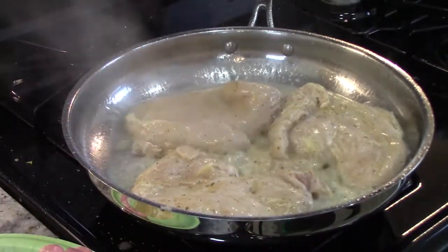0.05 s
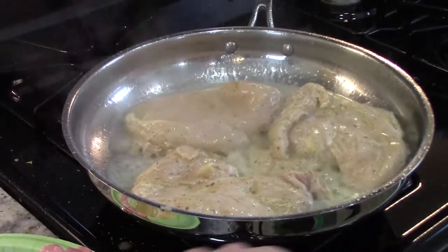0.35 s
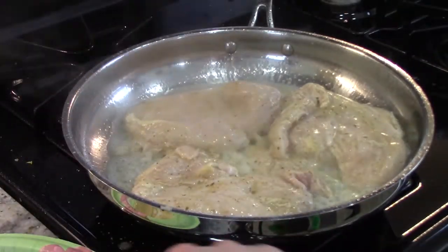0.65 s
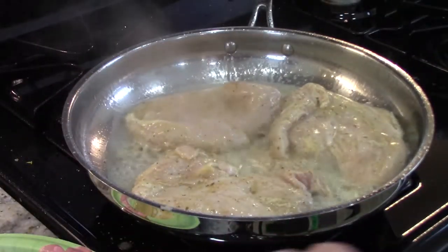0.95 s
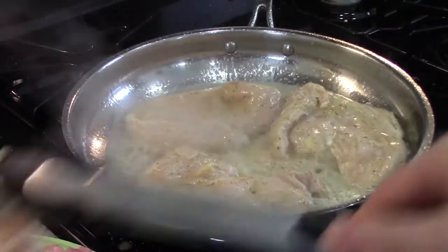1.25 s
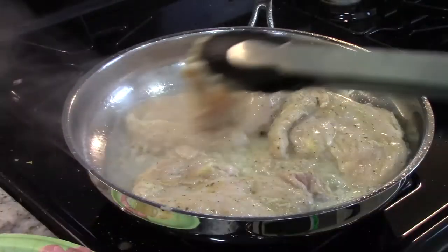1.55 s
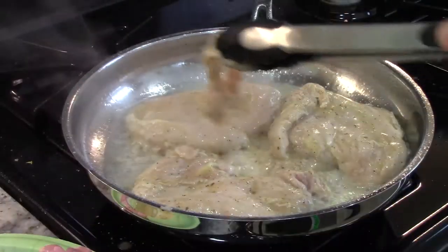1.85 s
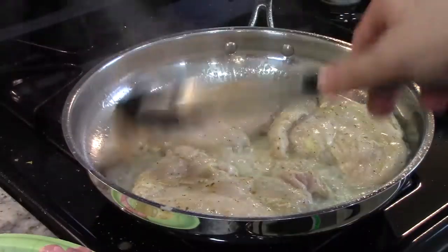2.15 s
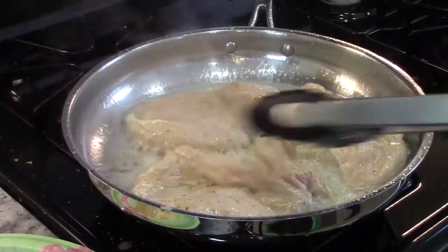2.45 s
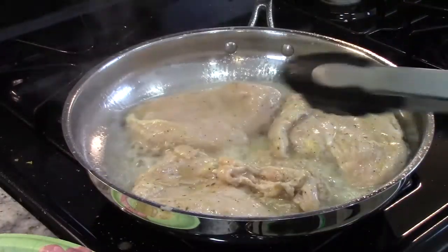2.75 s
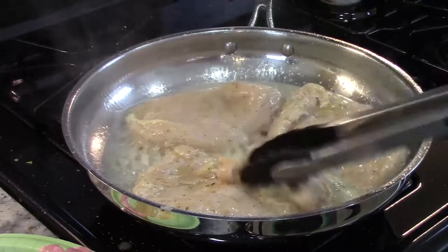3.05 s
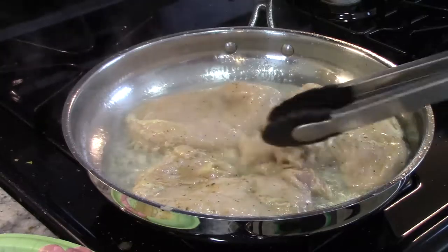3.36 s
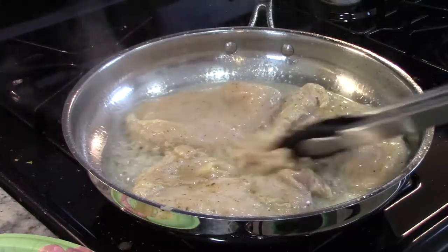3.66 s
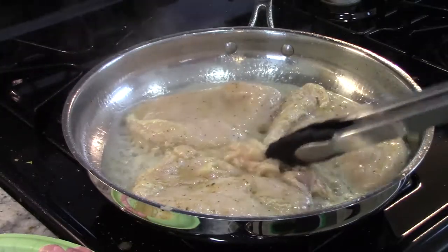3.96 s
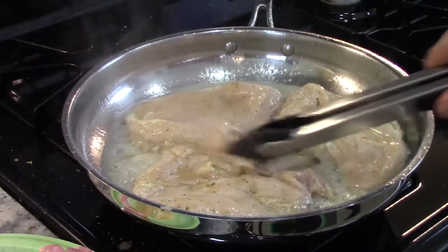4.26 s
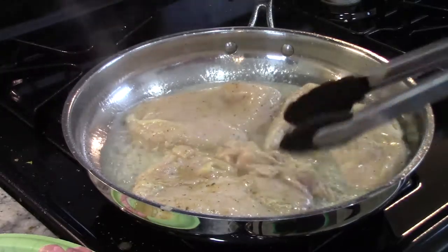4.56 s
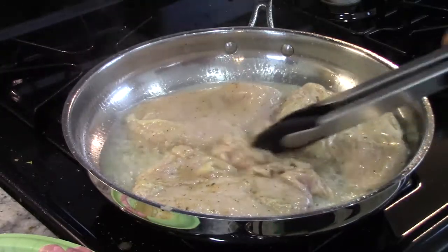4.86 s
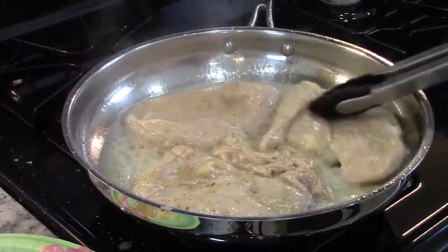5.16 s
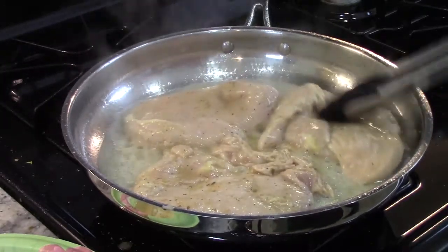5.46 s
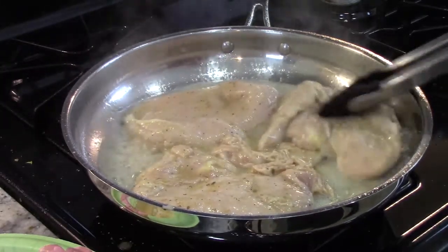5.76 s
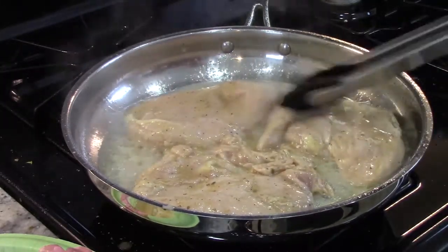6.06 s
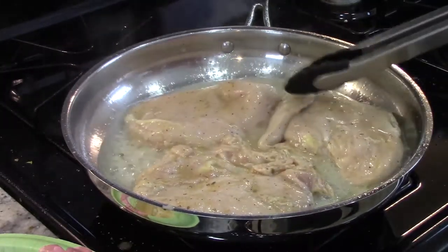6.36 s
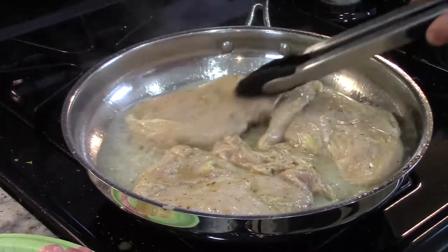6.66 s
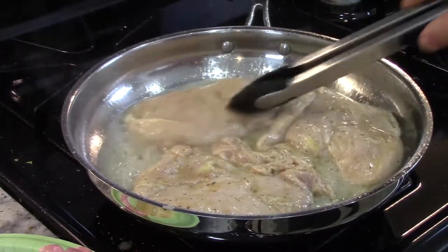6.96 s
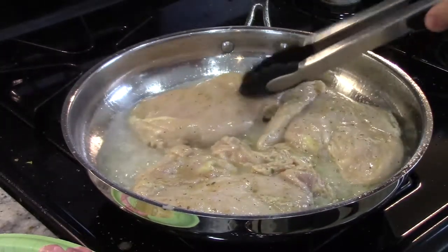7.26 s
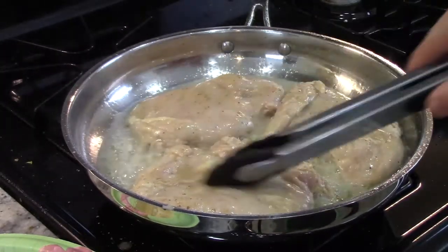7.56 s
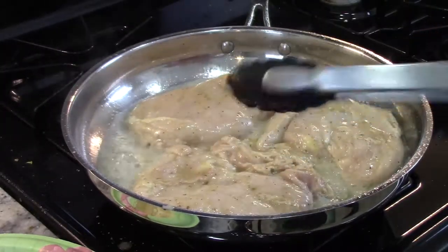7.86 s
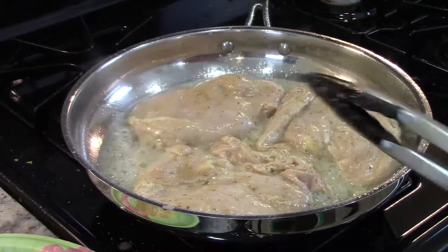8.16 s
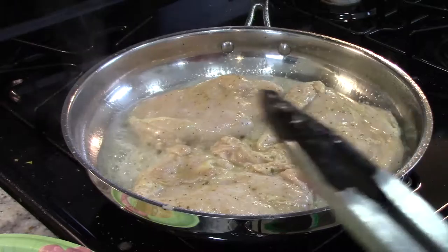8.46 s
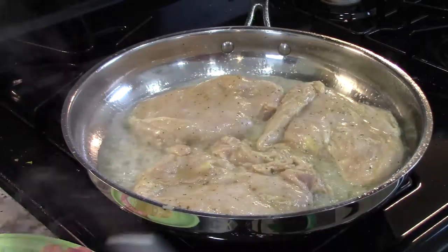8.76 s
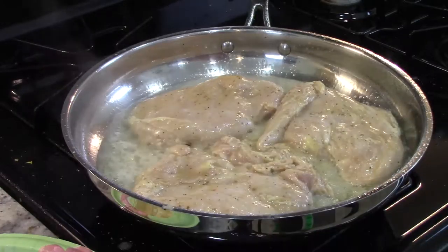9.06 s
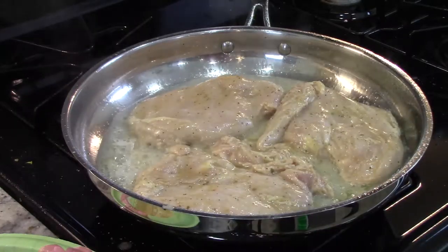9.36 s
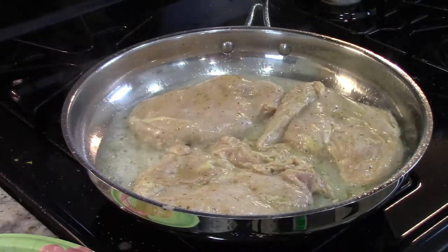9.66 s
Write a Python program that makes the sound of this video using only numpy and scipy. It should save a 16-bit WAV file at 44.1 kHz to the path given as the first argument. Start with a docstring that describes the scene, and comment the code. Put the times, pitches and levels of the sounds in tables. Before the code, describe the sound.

Chicken sizzles steadily in an oiled steel skillet, slowly easing, with small spits and bubbling pops later on.

```python
"""A kitchen, close to the stove: marinated chicken fries in a steel skillet while tongs nudge it about.
Countless steam bubbles burst in the oil as a bed of fizz, crackle and tiny rings, coloured by pan and room.
The sizzle sinks as the pan cools, and the stove hums underneath. Later, wet meat puffs on hot steel,
shoves rumble softly, drops spit, and a flood of juice brings fat bubbles and pops."""
import sys
import numpy as np
from scipy import signal
from scipy.fft import rfft, irfft, next_fast_len
from scipy.io import wavfile
from scipy.ndimage import uniform_filter1d

SR = 44100
rng = np.random.default_rng(int(sys.argv[2]) if len(sys.argv) > 2 else 0)


def generate_wav(signal):
    """Clip the signal to [-1, 1] and save it as 16-bit WAV at the path in sys.argv[1]."""
    frames = np.transpose(np.atleast_2d(signal))
    scaled = np.clip(frames, -1, 1) * 32767
    pcm = np.round(scaled).astype(np.int16)
    wavfile.write(sys.argv[1], SR, pcm)


N = 432163

# Tone of the bursting bubbles. Each row: frequency in Hz, relative level in dB.
SIZZLE_TONE = [(120, -21.5), (220, -15.5), (450, -15.5), (800, -12), (1200, -7.5), (1650, -10),
               (2900, -6.5), (4200, -3), (5200, -2.5), (6800, -5.5), (10000, -6), (13000, -10),
               (15800, -15)]
# Resonances of the pan and the hob around it. Each row: centre in Hz, width in Hz, lift in dB.
PAN_RESONANCES = [(300, 25, 3), (351.6, 41, 11), (492.6, 35.5, 12), (575, 44, 5), (620.5, 61, 9.5),
                  (687, 32, 4.5), (848, 35, 3), (1005, 36, 7.5), (1115, 54, 1.5), (1210, 58, 4),
                  (2016, 145, 7.5), (2150, 36, 7.5), (2197, 40, 2.5), (2544, 140, 2.5), (2690, 100, 1),
                  (3510, 65, 8), (3700, 90, 0.5), (4080, 80, 2), (4570, 70, 0), (4810, 70, -0.9),
                  (5220, 62, 3.5), (5280, 80, -1), (5800, 110, 1.5), (7230, 200, 2), (9030, 350, 1.5)]
# Where the sizzle leans in the stereo image. Each row: frequency in Hz, left minus right in dB.
SIZZLE_BALANCE = [(60, -3), (92, 0.0), (140, 18), (210, 0), (330, 1.5), (500, 4.0), (770, 4.0), (1170, 3.5),
                  (1790, 2.5), (2740, 3.5), (4190, 1), (6410, 4), (9810, 1.5), (15000, 0.5)]
# Stereo width. Each row: frequency in Hz, left-right likeness from 0 (wide) to 1 (mono).
STEREO_LIKENESS = [(100, 0.74), (620, 0.83), (800, .45), (1100, 0.8), (1450, .45), (2000, 0.86),
                   (2950, 0.26), (3600, 0.65), (4800, 0.96), (6000, 0.64), (7000, 0.15), (10000, 0.15),
                   (12000, 0.027), (16000, .03)]
# Wet meat meets fresh hot oil and the boil surges. Each row: start in seconds, lift in dB, decay in seconds.
BOIL_SURGES = [(0.13, 1.4, 0.4), (1.19, 1.2, 0.11), (1.98, 1.45, 0.78), (4.42, 1, .2), (5.82, 0, .2),
               (6.9, 1, .4), (7.95, 0.5, .2), (8.89, 1.5, 0.23)]
# Low wash of stove and kitchen. Each row: frequency in Hz, relative level in dB.
WASH_TONE = [(15, -15), (45, -12), (72, -4.5), (96, 6.5), (150, 5), (205, -15), (290, -2), (600, -36),
             (1500, -31), (6000, -48)]
# Mains hum of the stove. Each row: frequency in Hz, level in dB around which it wavers.
HUM_PARTIALS = [(120, -55.5), (360, -59.5)]
# Wet meat touches hot steel. Each row: start in seconds, relative level in dB, decay in seconds.
STEAM_PUFFS = [(3.855, -35, 0.014), (5.618, -35, .008), (5.67, -31, 0.012), (6.955, -41, .015),
               (8.101, -36, 0.033), (8.97, -35, .004)]
# The tongs push the meat about. Each row: start in seconds, length in seconds, level in dB.
MEAT_SHOVES = [(4.82, .26, -64), (5.17, .34, -53), (6.148, .3, -59)]
# Drops of juice burst in the oil. Each row: start in seconds, relative level in dB.
JUICE_SPITS = [(5.669, -15), (5.8784, -10), (6.31, -18), (6.6816, -11), (6.734, -11), (6.963, -13),
               (7.2004, -15), (7.3057, -11), (7.7696, -13), (8.3492, -20), (8.937, -16), (8.97, -18),
               (9.0737, -16)]
# The tongs press out a gush of juice. Each row: start in seconds, relative amount in dB.
JUICE_GUSHES = [(6.67, -13), (7.22, -6.5), (7.64, -4), (8.47, -13)]
# The largest juice bubbles pop. Each row: start in seconds, relative level in dB, starting pitch in Hz.
JUICE_POPS = [(6.7379, -22, 3490), (6.8971, -27, 2010), (6.9594, -27, 3510), (7.2694, -26, 2070),
              (7.4727, -26, 3130), (7.6533, -22, 2620), (7.7144, -32, 2420), (8.0365, -24, 2100),
              (8.5044, -29, 3470), (8.9344, -25, 3520)]

BOIL_DB, COOL_DB_PER_S = -26.5, 0.6319  # the boil sinks slowly as the meat cools the pan
STIR_S, STIR_DB_PER_S = 4.25, 0.6153  # shoving the large pieces about cools the oil further
FLOOD_S, FLOOD_DB_PER_S = 6.53, 1.35  # juice runs out from under a lifted piece and feeds the boil
REST_S, REST_DB_PER_S = 7.87, 3.5  # the tongs let go and the boil dies down


def amp(db):
    """Decibels to gain."""
    return 10 ** (np.asarray(db) / 20)


def unit_rms(x):
    """Scales to an rms of one."""
    return x / np.sqrt(np.mean(x ** 2) + 1e-20)


def curve(points, hz):
    """Reads a curve on a log-frequency axis."""
    point_hz, value = np.transpose(points)
    return np.interp(np.log(hz + 1), np.log(point_hz + 1), value)


def lean(db):
    """Stereo gains: left up by db, right down by as much."""
    return amp(np.array([[1], [-1]]) * db)


def add(mix, start_s, sound):
    """Drops a stereo sound into the mix."""
    part = mix[:, max(round(start_s * SR), 0):][:, :sound.shape[1]]
    part += sound[:, :part.shape[1]]


def eq(x, gain):
    """Filters by a gain that is a function of frequency."""
    size = next_fast_len(N + 4096)
    return irfft(rfft(x, size) * gain(np.fft.rfftfreq(size, 1 / SR)), size)[..., :N]


def wander(t, slow_hz, fast_hz, count=40):
    """A random wobble of unit rms, summed from sines."""
    hz = np.geomspace(slow_hz, fast_hz, count)[:, None]
    return unit_rms(np.sin(2 * np.pi * (hz * t + rng.random((count, 1)))).sum(0))


def swell(age, rise_s, decay_s):
    """Rises in a straight line to 1, then dies away."""
    return np.clip(age / rise_s, 0, 1) * np.exp(-np.maximum(age - rise_s, 0) / decay_s)


def stereo_blend(x):
    """Blends two unrelated channels into one image: narrow in the bass, wide at the top."""
    angle = lambda hz: np.arcsin(np.clip(curve(STEREO_LIKENESS, hz), -1, 1)) / 2
    return eq(x, lambda hz: np.cos(angle(hz))) + eq(x[::-1], lambda hz: np.sin(angle(hz)))


def kitchen(x, wet_db, t60):
    """Adds the quick, dense echoes of pan wall, hob and tiles."""
    t = np.arange(SR // 4) / SR
    taps = rng.standard_normal((2, len(t))) * (rng.random((2, len(t))) < .15) * (t > .0006)
    taps *= amp(-60 * t / t60)
    taps /= np.linalg.norm(taps, axis=1, keepdims=True)
    return x + amp(wet_db) * signal.oaconvolve(x, taps, axes=1)[:, :N]


def bursts(per_s, spread_db, limit):
    """Random clicks, mostly small and now and then large."""
    size = amp(spread_db * np.minimum(rng.exponential(1, N), limit))
    return size * rng.choice([-1, 1], N) * (rng.random(N) < per_s / SR)


def fizz():
    """Tiny steam bursts, so many that they blur into hiss."""
    return unit_rms(stereo_blend(kitchen(rng.standard_normal((2, N)), wet_db=-17, t60=.08)))


def crackle(per_s=750, rise_db=3):
    """Larger bursts on either side of the pan; they come forward as the fizz thins."""
    clicks = np.array([bursts(per_s, spread_db=4.2, limit=3.1) for _ in range(2)])
    bright = eq(stereo_blend(clicks), lambda hz: amp(curve([(1000, -3), (6000, 0.5), (14000, 2)], hz)))
    return unit_rms(kitchen(bright, wet_db=-1.5, t60=0.06) * amp(rise_db * np.arange(N) / N))


def bubbles(centre_hz, spread, cycles, per_s, count=48):
    """Bubbles ring for a few milliseconds, each at the pitch of its size, rising slightly as it opens."""
    t, out = np.arange(SR // 40) / SR, np.zeros((2, N))
    size_rank = (np.arange(count) + .5) / count
    pitches = centre_hz * (size_rank / (1 - size_rank)) ** (spread / 2)  # crowded around the centre
    for hz in pitches:
        ping = np.sin(2 * np.pi * hz * t * (1 + 1.1 * t)) * np.exp(-2 * hz * t / cycles)
        train = signal.oaconvolve(bursts(per_s, spread_db=3.2, limit=3), ping)[:N]
        side = rng.uniform(-0.31, 0.42)
        out += [(1 + side) * train, (1 - side) * np.roll(train, rng.integers(-2, 3))]
    return unit_rms(kitchen(out, wet_db=-1.5, t60=0.15))


def juice_in_oil(t, puddle_db=-7.5, drying_db_per_s=3, flood_db=-7, flood_rise_s=.6):
    """How much juice boils in the oil: a drying puddle, then a lasting flood with gushes on top."""
    puddle = amp(puddle_db - drying_db_per_s * t)
    flood = amp(flood_db) * np.clip(.5 + (t - FLOOD_S) / flood_rise_s, 0, 1)
    gushes = sum(amp(db) * swell(t - start, rise_s=0.075, decay_s=0.12) for start, db in JUICE_GUSHES)
    return puddle + flood + gushes


def boil_db(t):
    """How hard the pan boils: it cools in stages and surges when meat touches fresh oil."""
    since = lambda start: np.maximum(t - start, 0)
    cooling = COOL_DB_PER_S * t + STIR_DB_PER_S * since(STIR_S) + REST_DB_PER_S * since(REST_S)
    surges = sum(db * swell(t - start, rise_s=0.056, decay_s=decay) for start, db, decay in BOIL_SURGES)
    return BOIL_DB - cooling + FLOOD_DB_PER_S * since(FLOOD_S) + surges


def skillet(x, sway_db=0.17, flutter_db=0.52, cluster_db=1.01):
    """The boil rides the level of the bursts, in uneven clusters; the pan lends them its resonances."""
    hz, t, spectrum = signal.stft(x, SR, nperseg=1024, noverlap=768)
    resonance_db = sum(db * 0.5 ** ((2 * (hz - centre) / width) ** 2)
                       for centre, width, db in PAN_RESONANCES)
    colour = unit_rms(amp(curve(SIZZLE_TONE, hz) + resonance_db))
    # a hard boil throws finer spray, so the top rises and falls further than the middle
    spray = curve([(350, -0.13), (1200, 0.064), (2500, -0.051),
                   (5000, -0.02), (7500, -0.029), (13000, 0.29)], hz)
    boil = boil_db(t)
    level_db = boil + spray[:, None] * (boil - boil.mean())
    # clusters of like-sized bubbles come and go
    clusters = uniform_filter1d(rng.standard_normal(spectrum.shape[1:]), size=16, axis=0)
    level_db += cluster_db * unit_rms(uniform_filter1d(clusters, size=7, axis=1))
    level_db += sway_db * wander(t, 3, 12) + flutter_db * wander(t, 12, 45)
    sides = lean(curve(SIZZLE_BALANCE, hz) / 2)
    spectrum *= amp(level_db) * (sides * colour)[:, :, None]
    return signal.istft(spectrum, SR, nperseg=1024, noverlap=768)[1][:, :N]


def stove(wash_db=-55, waver_db=1.9):
    """A slightly wavering mains hum over a low wash."""
    t = np.arange(N) / SR
    hum = sum(np.sqrt(2) * amp(db) * np.sin(2 * np.pi * (hz * t + rng.random()))
              for hz, db in HUM_PARTIALS)
    wash = eq(stereo_blend(rng.standard_normal((2, N))), lambda hz: amp(curve(WASH_TONE, hz)))
    return hum * amp(waver_db * wander(t, 0.804, 7.6, count=12)) + amp(wash_db) * unit_rms(wash)


def steam_puffs():
    """Moisture on the meat flashes to steam against hot steel: short, bright puffs of noise."""
    t, out = np.arange(SR // 5) / SR, np.zeros((2, N))
    for start, db, decay in STEAM_PUFFS:
        add(out, start, amp(db) * np.exp(-t / decay) * rng.standard_normal((2, len(t))))
    return eq(out, lambda hz: amp(curve([(400, -20), (3500, 3), (9000, 13.5), (16000, 7)], hz)))


def shoves(low_hz=24, high_hz=35):
    """A soft sub rumble swells with each push of the meat."""
    out = np.zeros((2, N))
    for start, length, db in MEAT_SHOVES:
        t = np.arange(int(length * SR)) / SR
        rumble = np.array([wander(t, low_hz, high_hz, count=5) for _ in range(2)])
        add(out, start, amp(db) * rumble * signal.windows.tukey(len(t), .6))
    return out


def spits(ring_hz=6500, decay_s=0.00017, low_cut_hz=2200):
    """A drop explodes in the oil with a snap of about one cycle, a little to one side."""
    t, out = np.arange(SR // 200) / SR, np.zeros((2, N))
    for start, db in JUICE_SPITS:
        detune, side = rng.uniform(-1.4, 1, 2)
        snap = np.cos(2 * np.pi * ring_hz * 2 ** (detune / 2) * t) * np.exp(-t / decay_s)
        add(out, start, amp(db) * lean(2.5 * side) * snap)
    thinned = eq(out, lambda hz: hz / np.hypot(hz, low_cut_hz))
    return kitchen(thinned, wet_db=5, t60=0.054)


def pops(decay_s=0.0022):
    """A big bubble of juice opens with a short ring that bends upward."""
    t, out = np.arange(SR // 30) / SR, np.zeros((2, N))
    for start, db, hz in JUICE_POPS:
        ring = np.sin(2 * np.pi * hz * t * (1 + 4 * t)) * np.exp(-t / decay_s)
        add(out, start, amp(db) * lean(db=1) * ring)
    return kitchen(out, wet_db=2, t60=.08)


def scene():
    """The mix: a sizzling bed, sharp accents on top, stove and shoves underneath."""
    juice = juice_in_oil(np.arange(N) / SR)
    # where juice floods the oil, small bubbles give way to fat ones
    small = bubbles(centre_hz=4994, spread=0.136, cycles=26, per_s=10) / (1 + 2 * juice)
    fat = bubbles(centre_hz=2850, spread=0.238, cycles=8.7, per_s=10) * juice
    sizzle = skillet(amp(2.0) * fizz() + amp(-3.0) * crackle() + amp(-9.0) * small + amp(-4.5) * fat)
    return sizzle + amp(-2.5) * spits() + amp(-1.5) * pops() + steam_puffs() + stove() + shoves()


def record(dry, high_cut_hz=15850):
    """A steep high cut takes the very top off the mix."""
    lowpass = signal.firwin(1023, high_cut_hz, window=("kaiser", 9), fs=SR)
    return signal.oaconvolve(dry, lowpass[None], "same")


dry = scene()
out = record(dry)
generate_wav(out)
```